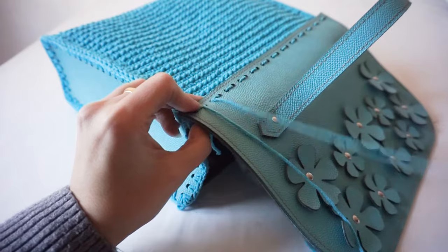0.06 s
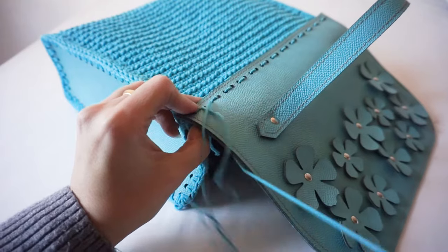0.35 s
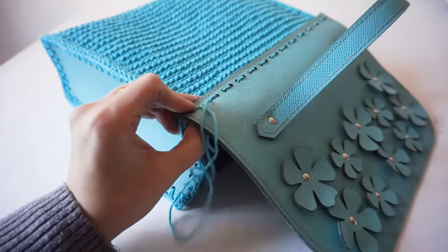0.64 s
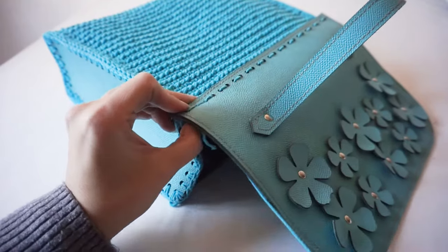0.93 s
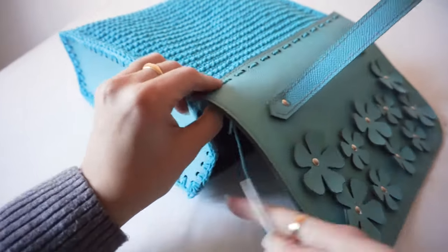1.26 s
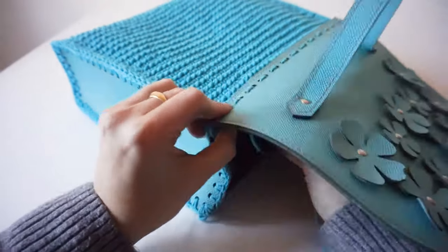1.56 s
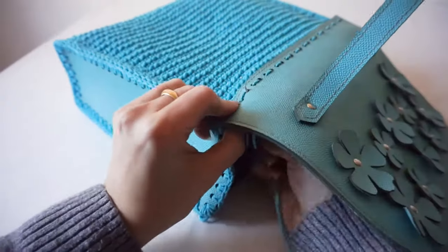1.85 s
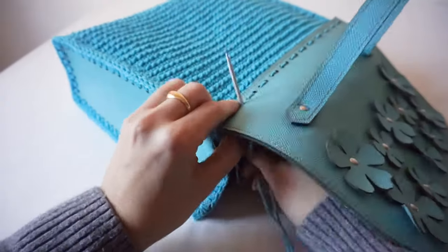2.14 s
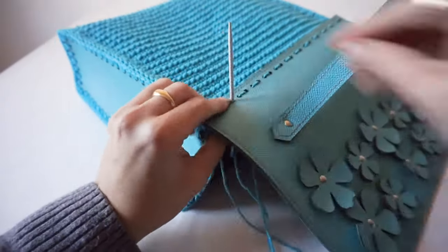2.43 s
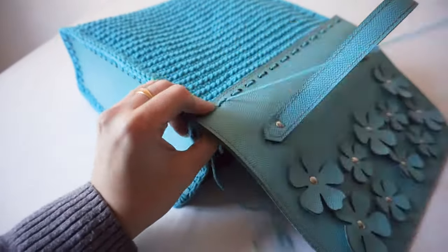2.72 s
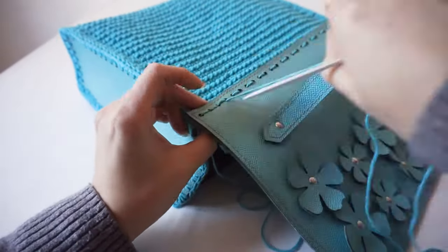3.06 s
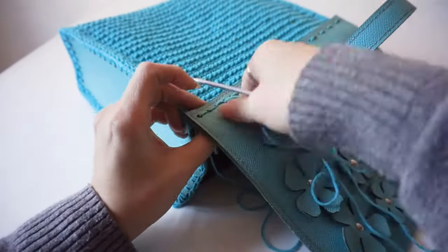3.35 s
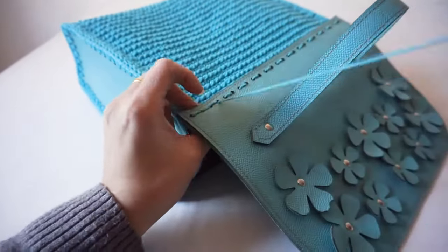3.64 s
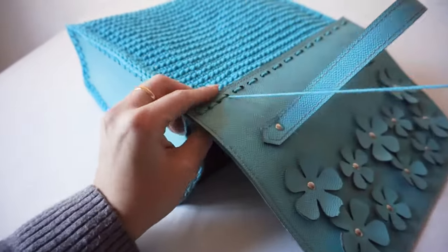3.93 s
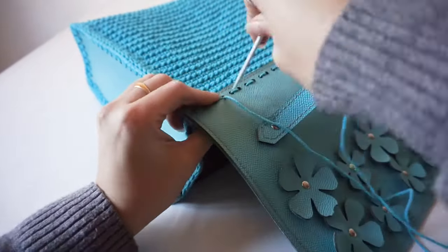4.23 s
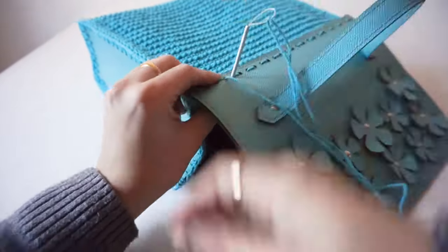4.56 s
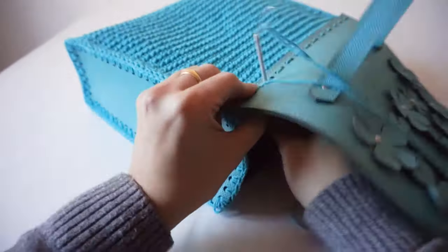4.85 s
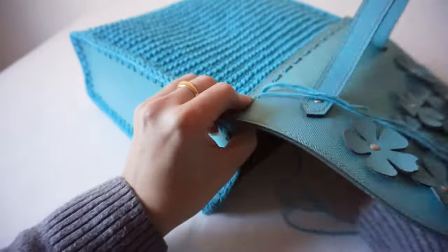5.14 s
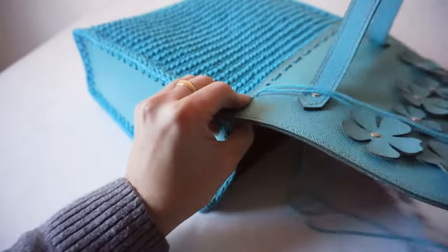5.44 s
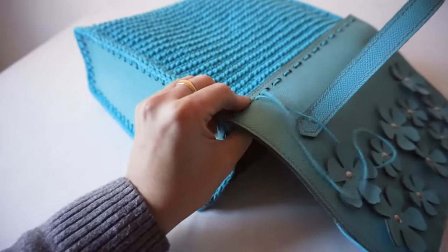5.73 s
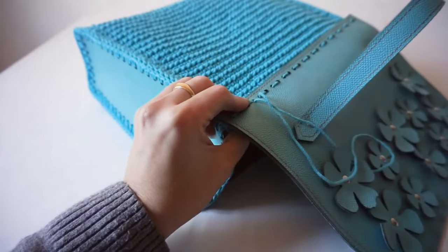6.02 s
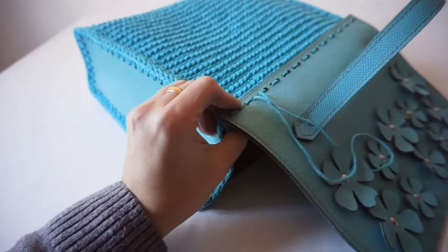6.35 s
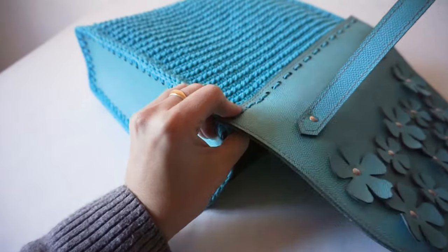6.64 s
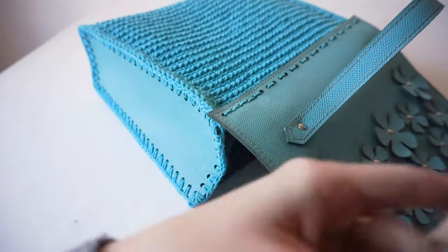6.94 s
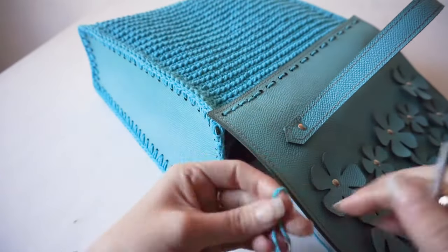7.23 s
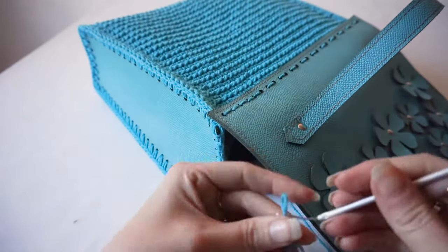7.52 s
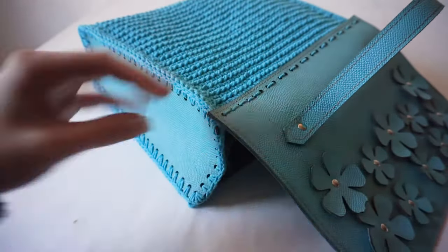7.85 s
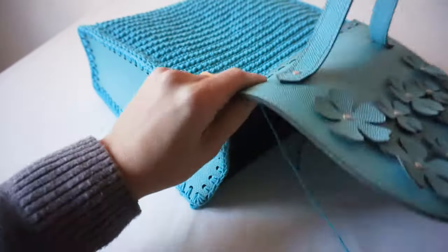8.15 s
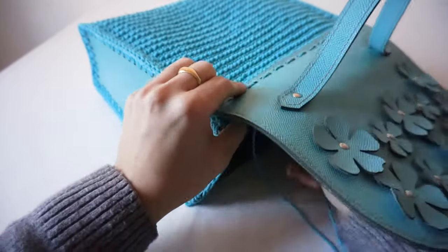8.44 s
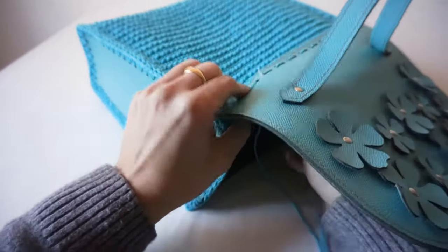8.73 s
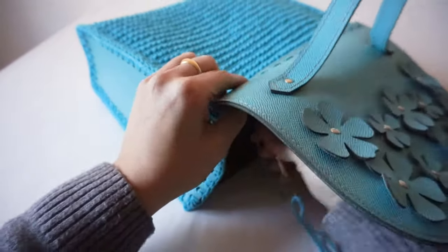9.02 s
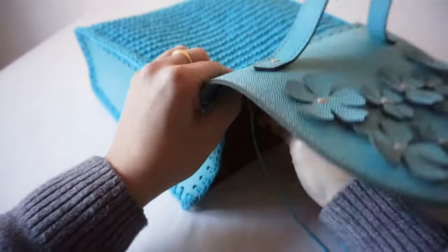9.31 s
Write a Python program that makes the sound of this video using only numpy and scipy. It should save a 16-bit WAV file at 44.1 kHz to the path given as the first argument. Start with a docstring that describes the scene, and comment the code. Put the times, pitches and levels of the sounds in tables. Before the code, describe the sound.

Hands stitch a leather flap to a crocheted bag on a table, heard close up in a small quiet room. The bag rustles and drags softly throughout, with dull bumps on the tabletop. Early on, a steel needle clinks in a quick, bright cluster. Then cord hisses through the holes in repeated short pulls, mixed with dry snaps, fingers rasping on leather and brief creaks as the needle jerks free. After a quieter spell, light bumps and ticks return.

```python
"""At a table in a small quiet room, hands stitch a leather flap to a crocheted bag, heard close up.
The bag drags and rustles, palms press on it, cord hisses through the holes and fingers rub the hide.
Leather and cord snap over edges, and bumps set the table ringing and the hollow bag humming.
The steel needle clinks, creaks as it jerks free of the hide and squeaks as the cord slips off it."""
import sys
import numpy as np
from scipy import signal
from scipy.fft import rfft, irfft
from scipy.io import wavfile
from scipy.ndimage import uniform_filter1d

SR = 44100
rng = np.random.default_rng(int(sys.argv[2]) if len(sys.argv) > 2 else 0)


def int16_out(signal):
    """Quantize to a 16-bit WAV file."""
    q = np.round(np.clip(np.atleast_2d(signal).T, -1, 1) * 32767)
    wavfile.write(sys.argv[1], SR, q.astype(np.int16))


N = 418068
EVENT_SAMPLES = SR // 2  # room for one blow or stroke
AGE = np.arange(EVENT_SAMPLES) / SR  # seconds since it began
ROOM_T60_S = 0.26  # a t60 is the time a sound takes to fall by 60 dB

# hands and bag bumping the table: t/s, level/dB, hardness/dB, weight/dB, hum f/Hz, hum against bump/dB
BUMPS = [(0.6011, -25.5, 11, -25, 358, -9.5), (0.62, -32, 5, -1, 393, -8.5),
         (0.707, -42.5, 11, -5, 366, -21), (1.2992, -28.5, 4.5, -19, 270, -14),
         (1.332, -31.5, 11, -13, 404, -29), (1.393, -33.5, 0, 4, 384, -9),
         (1.857, -39.5, 5, -11, 358, -5.5), (1.895, -37.5, 5.5, -7, 357, -7.5),
         (2.0783, -33, 1.5, -18, 386, -9), (2.338, -41, -1, -9, 394, -9), (2.356, -37, -1, -4, 394, -9),
         (2.411, -35, -2.5, -10, 286, -13), (2.419, -32, 9, -18, 388, -5), (2.433, -46, 15, -24, 380, -9),
         (2.564, -42.5, 0, -8, 400, -7.5), (2.638, -37.5, -1.5, -2, 402, -10),
         (2.724, -39, -2, -15, 411, -8), (2.995, -41.5, 4.5, -13, 348, -1.5),
         (3.251, -37, 5, -13, 517, -13.5), (3.399, -39.5, 5.5, -9, 452, -23),
         (4.656, -31.5, 1.5, -28, 354, -4.5), (4.67, -37.5, 1, -1, 358, -3),
         (4.816, -41.5, -1, -18, 361.4, -1), (4.835, -42, -2.5, -12, 386, -14),
         (4.9038, -44.5, 4, -7, 351, -4), (5.0226, -40.5, 0.5, -11, 295, -23),
         (5.0616, -22, -1, -13, 352, -8.5), (5.135, -41.5, 10, 7, 355, -6), (5.491, -44, -3.5, -6, 348, -7),
         (5.5785, -28.5, 8.5, -11.5, 358, -10), (6.273, -44.5, -1, 5.5, 349, -3),
         (6.317, -45, -4.5, -17, 333, -2), (6.334, -42, -6, 1, 367, -6.5), (6.778, -57, -3, -3, 362, -5),
         (8.338, -37.5, -4, -4.5, 412, -7.5), (8.478, -50, -4, -2, 361, -4.5),
         (8.528, -49.5, -10, -16, 327, 2.5), (8.551, -43.5, 4, 2.5, 298, -3),
         (8.571, -42.5, 7, 2.5, 352, -5), (8.781, -43.5, -7.5, -12, 252, -13),
         (9.347, -51, 0, -7, 346, -13)]
# strokes over the leather: start/s, end/s, level/dB, treble/dB
RUBS = [(0.387, 0.45, -57.5, -8), (0.689, 0.728, -59, -11), (2.096, 2.203, -62, 5), (2.278, 2.316, -50, 6),
        (2.754, 2.828, -49, -1), (3.56, 3.833, -67, 6), (4.739, 4.759, -43, 1), (4.764, 4.804, -43.5, -6),
        (4.815, 4.868, -53, -2), (5.237, 5.38, -60, 1), (5.631, 5.828, -49.5, 1.5), (6.438, 6.58, -50, 0.5),
        (8.514, 8.62, -61.5, 7), (8.782, 8.856, -55.5, -12)]
# the notes (modes) at which the table top rings: f/Hz, level/dB, t60/s
TABLE_MODES = [(90.3, -5.5, 0.26), (162, -16, 0.23), (200.2, -5.5, 0.23), (326.5, 0.5, 0.049),
               (505, -1.5, 0.036), (597, -11.5, 0.33), (689, -14.5, 0.25), (824, -8.5, 0.063),
               (887, -14.5, 0.21), (976, -10, 0.1), (1053, -12.5, 0.12), (1112, -11, 0.13),
               (1290, -6.5, 0.044), (1735, -29, 0.14), (2170, -11.5, 0.11)]
# stereo width, left and right agree only in the bass: f/Hz, side against middle/dB
STEREO_WIDTH = [(30, -24), (90, -21.5), (300, -16), (700, -6), (1400, -2), (2800, -0.5), (6000, -0.5),
                (11000, 0.5)]


def undb(db):
    """Turn decibels into a factor to multiply by."""
    return 10 ** (np.asarray(db) / 20)


def unit(x):
    """Scale a signal to an average (rms) level of 1."""
    return x / np.sqrt(np.mean(x ** 2))


def colour(x, points, size=4096):
    """Make some pitches louder and others softer, along a curve of (f/Hz, level/dB) points."""
    hz, db = np.transpose(points)
    grid_hz = np.maximum(np.fft.rfftfreq(size, 1 / SR), 1)
    gains = undb(np.interp(np.log(grid_hz), np.log(hz), db))
    # fold the cepstrum so that the filter never sounds ahead of its input
    cepstrum = irfft(np.log(gains))
    cepstrum[1:size // 2] *= 2
    cepstrum[size // 2 + 1:] = 0
    response = irfft(np.exp(rfft(cepstrum)))
    return signal.fftconvolve(np.atleast_2d(x), response[None], axes=1)[:, :x.shape[-1]]


def spread(pair):
    """Two unrelated signals become left and right, wider towards the treble."""
    side = colour(pair[1], STEREO_WIDTH)[0]
    return np.array([pair[0] + side, pair[0] - side])


def fade(t60):
    """Die away smoothly, 60 dB down after t60 seconds."""
    return np.exp(-np.log(1000) * AGE / t60)


def scatter(t60, side_db=0):
    """Dying noise with energy 1: a click when short, a cloud of echoes when long."""
    pair = rng.standard_normal((2, EVENT_SAMPLES)) * undb([[0], [side_db]])
    cloud = spread(pair) * fade(t60)
    return cloud / np.sqrt(np.sum(cloud ** 2) / 2)


def ring(modes, vary_db):
    """An object's dying notes, with energy 1; a random striking spot varies their levels."""
    tone = sum(undb(db + vary_db * rng.standard_normal()) * np.sin(2 * np.pi * hz * AGE) * fade(t60)
               for hz, db, t60 in modes)
    return tone / np.sqrt(np.sum(tone ** 2))


def excite(force, tone):
    """Every little push in the force starts the tone anew."""
    return signal.fftconvolve(force, tone[None], axes=1)[:, :force.shape[1]]


def wander(size, per_s):
    """Glide to a new random value per_s times a second."""
    hold = int(SR / per_s)
    steps = np.repeat(rng.standard_normal(size // hold + 1), hold)
    return uniform_filter1d(steps, hold)[:size]


def slips(size, per_s, size_db, grip_db, smear_db, grain_s=0.0029, smear_s=0.018):
    """Stick and slip: tiny uneven bursts, in flurries as the grip changes, smeared by nearby surfaces."""
    sizes = undb(size_db * np.minimum(rng.exponential(size=size), 5))
    slipping = rng.random(size) < per_s / SR
    grip = undb(grip_db * wander(size, per_s=55))
    energy = slipping * (sizes * grip) ** 2
    decays = np.exp(-1 / (SR * np.array([grain_s, smear_s])))
    grain, smear = (signal.lfilter([1 - decay], [1, -decay], energy) for decay in decays)
    loudness = np.sqrt(grain + undb(smear_db) ** 2 * smear + 1e-12)
    return loudness * spread(rng.standard_normal((2, size)))


def add_blow(out, t, blow, db, window=90):
    """Place a blow at t seconds; its loudest stretch of window samples gets the level db."""
    loudest = np.sqrt(uniform_filter1d(np.mean(blow ** 2, axis=0), window).max())
    first = max(int(t * SR), 0)
    out[:, first:first + EVENT_SAMPLES] += (blow * undb(db) / loudest)[:, :N - first]


def add_stroke(out, start, end, sound, db, swell_db, rise_s, fall_s):
    """Place one hand movement: it gathers speed, swells to its middle and dies away after the end."""
    elapsed, length = AGE - rise_s / 2, end - start
    progress = np.clip(elapsed / length, 0, 1)
    swell = undb(swell_db * (np.sin(np.pi * progress) - 2 / np.pi))
    rise = np.minimum(AGE / rise_s, 1)
    fall = np.exp(-np.maximum(elapsed - length, 0) / fall_s)
    stroke = unit(sound) * swell * rise * fall * undb(db)
    first = max(int((start - rise_s / 2) * SR), 0)
    out[:, first:first + EVENT_SAMPLES] += stroke[:, :N - first]


def room_air(level_db=-65.5):
    """The steady hush of the room and the hiss of the microphone."""
    # tone of the hush: f/Hz, level/dB
    air_colour = [(25, -27), (90, -7), (140, -6), (360, -14), (650, -8), (1300, -32), (2000, -14),
                  (3500, -16.5), (6000, -16), (10000, -19), (16000, -17.5)]
    noise = spread(rng.standard_normal((2, N)))
    return undb(level_db) * unit(colour(noise, air_colour))


def leaning(ease_s=0.069):
    """Rises towards 1 while a stroke over the leather leans on the bag, and is 0 otherwise."""
    t = np.arange(N) / SR
    pressed = np.any([(t > start) & (t < end) for start, end, *_ in RUBS], axis=0)
    return uniform_filter1d(pressed.astype(float), int(ease_s * SR))


def settling(against_bump_db=-20, decay_s=0.033):
    """A gain that jumps with every bump and dies away as the stitches come to rest."""
    jolts = np.zeros(N)
    for t, db, *_ in BUMPS:
        jolts[int(t * SR)] += undb(db + against_bump_db)
    return signal.lfilter([1], [1, -np.exp(-1 / (decay_s * SR))], jolts)


def bag_sliding(drag_db=-5, lean_db=5):
    """Worked by the hands, the bag shudders on the table, which rings along, and its wool crackles."""
    # how hard the hands work, swelling with each stitch: t/s, level/dB
    effort = [(0.0, -60), (0.34, -65.5), (0.61, -57.5), (1.11, -64.5), (1.4, -56.5), (1.87, -62),
              (2.21, -53), (4.43, -66), (4.86, -53.5), (5.36, -58.5), (5.68, -58.5), (5.86, -64),
              (6.31, -69), (6.42, -58.5), (6.97, -65), (7.76, -65.5), (9.0, -57.5), (9.48, -60.5)]
    # notes of the air in the resting bag: f/Hz, level/dB, t60/s
    bag_modes = [(358, 6.5, 0.21), (386, 5.5, 0.24)]
    # tone of the bag dragging: f/Hz, level/dB
    drag_colour = [(30, -35), (60, -16.5), (88, 0), (125, -14.5), (240, -4), (350, -12), (400, 2.5),
                   (480, -5.5), (800, -16), (1100, -19.5), (2400, -30.5)]
    # tone of the wool rustling: f/Hz, level/dB
    rustle_colour = [(300, 5.5), (700, 12), (1400, 8), (2000, 4.5), (3200, 4.5), (5000, 1.5), (8000, 1),
                     (15000, -0.5)]
    effort_db = np.interp(np.arange(N) / SR, *np.transpose(effort))
    shudder = slips(N, per_s=180, size_db=1.0, grip_db=0.5, smear_db=-0.5)
    ringing = excite(shudder, ring(TABLE_MODES + bag_modes, vary_db=4.5))
    drag = unit(colour(shudder, drag_colour)) + unit(ringing)
    drag_gain = undb(effort_db + drag_db + lean_db * leaning())
    crackle = slips(N, per_s=900, size_db=3.8, grip_db=1.8, smear_db=2)
    rustle = colour(crackle, rustle_colour)
    rustle_gain = np.hypot(undb(effort_db), settling())
    return unit(drag) * drag_gain + unit(rustle) * rustle_gain


def palm_presses(hollow_db=11, width_ratio=1.235):
    """A soft hand spreads over the stitches, which slip one by one and murmur in the hollow bag."""
    # palm and sleeve pressing on the crochet: start/s, end/s, level/dB, hollow f/Hz
    presses = [(0.008, 0.05, -57, 373), (0.38, 0.525, -62.5, 365), (1.01, 1.041, -55, 360),
               (1.113, 1.195, -60.5, 345), (2.19, 2.27, -51, 350), (3.055, 3.123, -54, 355),
               (3.486, 3.613, -59, 344), (3.733, 3.78, -54, 358), (4.701, 4.748, -49.5, 370),
               (5.691, 5.84, -57, 320), (6.421, 6.585, -54, 322), (7.436, 7.5, -58.5, 405),
               (8.005, 8.097, -58, 300), (9.119, 9.156, -54.5, 358)]
    # dull tone of pressed stitches: f/Hz, level/dB
    press_colour = [(50, -15), (220, -1), (500, 0), (1100, -9.5), (8000, -44)]
    out = np.zeros((2, N))
    for start, end, db, hz in presses:
        grain = slips(EVENT_SAMPLES, per_s=420, size_db=1.5, grip_db=1.0, smear_db=-2.5)
        stitches = colour(grain, press_colour)
        murmur = colour(stitches, [(hz / width_ratio, 0), (hz, hollow_db), (hz * width_ratio, 0)])
        add_stroke(out, start, end, murmur, db, swell_db=2, rise_s=0.016, fall_s=0.021)
    return out


def cord_pulls(width_ratio=1.27, octave_db=3):
    """Fibres hiss as they slide; their even twist adds a narrow zip and a faint octave above it."""
    # cord and wool sliding: start/s, end/s, level/dB, zip f/Hz, zip boost/dB
    pulls = [(0.318, 0.475, -58, 5900, -2), (0.506, 0.733, -53.5, 6750, 8.5), (0.78, 0.875, -55, 7260, 6),
             (1.46, 1.608, -56.5, 7320, 6), (2.058, 2.184, -49.5, 6900, 11), (2.257, 2.403, -50, 6700, 8),
             (2.423, 2.566, -59.5, 7000, 30), (2.614, 2.76, -52, 5900, 8), (2.76, 2.816, -44.5, 5870, 17.5),
             (2.846, 3.1, -59.5, 6850, 9), (3.49, 3.58, -59, 6470, 3), (3.581, 3.76, -51, 5950, 10),
             (3.628, 3.762, -56, 11700, 9), (4.483, 4.494, -47, 5900, -3), (4.736, 4.81, -46, 7300, 3.5),
             (4.96, 4.996, -49, 7300, 12), (5.248, 5.428, -55.5, 6700, 3.5), (5.48, 5.801, -51, 6050, 6),
             (6.351, 6.43, -57, 6860, 9), (6.439, 6.555, -50, 6200, 7), (6.847, 6.97, -63.5, 6900, 10),
             (7.203, 7.39, -65, 6600, 12), (8.123, 8.27, -62.5, 6660, 8), (8.353, 8.634, -58, 7200, 0),
             (8.923, 9.115, -59.5, 6670, 15)]
    # tone of the hissing cord: f/Hz, level/dB
    cord_colour = [(1000, 4.6), (3000, 5.6), (5000, 4.1), (7000, 3.5), (9000, 2.7), (11500, 4.6),
                   (13500, 2.8), (16000, 1)]
    out = np.zeros((2, N))
    for start, end, db, zip_hz, zip_db in pulls:
        grain = slips(EVENT_SAMPLES, per_s=1800, size_db=3.5, grip_db=2.5, smear_db=2)
        hiss = colour(grain, cord_colour)
        for hz, boost_db in ((zip_hz, zip_db), (2 * zip_hz, octave_db)):
            hiss = colour(hiss, [(hz / width_ratio, 0), (hz, boost_db), (hz * width_ratio, 0)])
        add_stroke(out, start, end, hiss, db, swell_db=1, rise_s=0.031, fall_s=0.022)
    return out


def leather_rubs():
    """Fingers and cord rasp over the hide in quick little slips; a soft fingertip gives less treble."""
    # tone of rubbed leather: f/Hz, level/dB
    leather_colour = [(200, -1), (400, 6), (800, -12.5), (1270, 6), (1600, -2), (2250, 4), (2900, 0.5),
                      (3450, 3), (4300, -2), (5100, -11), (5900, -24), (7500, -16), (14000, -32)]
    out = np.zeros((2, N))
    for start, end, db, treble_db in RUBS:
        grain = slips(EVENT_SAMPLES, per_s=750, size_db=2.3, grip_db=1.7, smear_db=-6, grain_s=0.0016)
        rasp = colour(grain, leather_colour)
        rasp = colour(rasp, [(2300, 0), (4000, treble_db)])
        add_stroke(out, start, end, rasp, db, swell_db=3, rise_s=0.025, fall_s=0.017)
    return out


def edge_snaps(near_db=-5, room_db=-9, extra_treble_db=1):
    """A fold or a strand lets go within a few milliseconds: a dry, grainy tick with no pitch."""
    # leather and cord snapping over an edge: t/s, level/dB, treble/dB
    snaps = [(0.445, -40.5, 16), (0.6, -37, -34), (1.895, -27.5, 10.5), (2.4182, -32, 9), (2.629, -32, -2),
             (2.717, -37.5, 0), (2.9068, -40, 17), (2.971, -43.5, -11), (2.9854, -35, 2), (3.2508, -37, 4),
             (3.399, -37, 0), (3.585, -39, 12), (3.764, -36.5, 9), (3.91, -40, -3), (4.1808, -43, 18),
             (4.624, -40.5, 3), (4.6554, -35.5, 7), (4.8347, -37.5, -11), (4.862, -36.5, -8),
             (4.9013, -39, -4), (5.359, -33.5, 11), (5.375, -37.5, -3), (5.5785, -30.5, -1),
             (5.876, -49.5, -5), (6.432, -39, 4), (8.549, -41, 10), (8.7157, -44, 29), (8.7808, -42.5, 6),
             (8.819, -42, 10), (8.863, -38.5, -3), (9.1974, -53, -21), (9.3505, -41.5, 7), (9.398, -41, 0)]
    # tone of a snap: f/Hz, level/dB
    snap_colour = [(300, -12), (1200, -3), (2600, 3), (4500, 0), (5700, 0), (7000, -3.5), (10000, -7.5),
                   (16000, -10.5)]
    out = np.zeros((2, N))
    for t, db, treble_db in snaps:
        release = scatter(0.009)
        echoes = undb(near_db) * scatter(0.23) + undb(room_db) * scatter(ROOM_T60_S)
        tick = colour(release + echoes, snap_colour)
        tick = colour(tick, [(3500, 0), (10000, treble_db + extra_treble_db)])
        add_blow(out, t, tick, db)
    return out


def table_bumps(modes_db=-3, near_db=-2, room_db=-6, extra_bass_db=2):
    """Each push rings the table top and sets the hollow bag humming; the soft bag bounces once."""
    # tone of a knock on the table: f/Hz, level/dB
    bump_colour = [(30, -18), (60, -15), (88, 0), (125, -3), (340, 3), (520, -4), (1100, -7), (2200, -10),
                   (3400, -16), (12000, -33)]
    touch_rise_s, touch_db = 0.0036, -55.5  # a touch this light builds up this slowly, louder ones faster
    bounce_s, bounce_db, bounce_spread = 0.0105, -7.5, 0.2024
    hum_rise_s, hum_t60_s = 0.0022, 0.18
    hum_shape = (1 - np.exp(-AGE / hum_rise_s)) * fade(hum_t60_s)
    out = np.zeros((2, N))
    for t, db, hardness_db, weight_db, hum_hz, hum_db in BUMPS:
        contact = 0.45 * (AGE == 0) + 0.55 * scatter(0.025, side_db=-10)
        echoes = undb(near_db) * scatter(0.24, side_db=-35) + undb(room_db) * scatter(ROOM_T60_S)
        knock = colour(contact + echoes, bump_colour)
        knock /= np.sqrt(np.sum(knock ** 2) / 2)
        blow = knock + undb(modes_db) * ring(TABLE_MODES, vary_db=1.5)
        blow = colour(blow, [(90, weight_db + extra_bass_db), (300, 0), (450, 0), (1000, hardness_db / 2)])
        # a softer contact lasts longer, so it loses more treble
        cutoff_hz = np.clip(1150 * undb(hardness_db), 300, 2600)
        blow = signal.sosfilt(signal.butter(4, cutoff_hz, fs=SR, output="sos"), blow)
        rise_s = touch_rise_s * undb(touch_db - db) ** 2
        blow *= 1 - np.exp(-AGE / rise_s)
        add_blow(out, t, blow, db, window=180)
        delay_s = bounce_s * np.exp(bounce_spread * rng.standard_normal())
        add_blow(out, t + delay_s, blow, db + bounce_db, window=180)
        hum = np.sin(2 * np.pi * hum_hz * AGE) * hum_shape
        add_blow(out, t, hum[None], db + hum_db, window=180)
    return out


def needle_clinks(tip_db=-3, modes_db=-2, near_db=-4, room_db=-9, extra_treble_db=3):
    """The steel needle strikes and rings; the fingers quiet it within a few hundredths of a second."""
    # the needle's strikes: t/s, level/dB, treble/dB
    clinks = [(1.298, -33, 1), (1.3077, -23, -4), (1.3088, -20, -0.5), (1.316, -23, -2), (1.331, -26, -6),
              (1.3325, -22, -7), (1.336, -39, 5), (1.351, -33, -4), (1.4274, -31.5, -1),
              (2.0454, -40, -4.5), (2.234, -33.5, 1), (2.3436, -27, 4.5)]
    # notes of the needle held in the fingers: f/Hz, level/dB, t60/s
    needle_modes = [(2760, -4, 0.035), (3330, 4, 0.013), (4000, -1, 0.017), (4100, 7.5, 0.029),
                    (4420, 7.5, 0.011), (5560, -13, 0.016), (6200, -2, 0.016), (7540, -4, 0.0066)]
    # tone of the strike: f/Hz, level/dB
    clink_colour = [(300, 3.5), (1400, -5), (3000, 2), (4200, 5.5), (6200, 5), (8000, 4), (11000, 1.5),
                    (16000, -2)]
    out = np.zeros((2, N))
    for t, db, treble_db in clinks:
        crack = undb(tip_db) * scatter(0.0019) + scatter(0.088)
        echoes = undb(near_db) * scatter(0.36) + undb(room_db) * scatter(ROOM_T60_S)
        steel = excite(scatter(0.002, side_db=-3), ring(needle_modes, vary_db=2))
        clink = unit(colour(crack + echoes, clink_colour)) + undb(modes_db) * unit(steel)
        clink = colour(clink, [(4500, 0), (10000, treble_db + extra_treble_db)])
        add_blow(out, t, clink, db)
    return out


def needle_catches(modes_db=-8, near_db=-5):
    """The needle sticks in the hide and jerks free: a short creak that rings the stiff flap."""
    # the needle catching: t/s, level/dB, strongest f/Hz
    catches = [(2.639, -40, 1830), (2.652, -45, 2210), (2.987, -44.5, 1290), (3.2405, -39, 1110),
               (3.2505, -36.5, 1050), (3.262, -38.5, 1050), (3.377, -46, 1300), (3.398, -50, 1500),
               (3.405, -41.5, 1420), (5.5654, -37, 2000), (5.5785, -33, 1250), (8.55, -46, 1700),
               (8.571, -42, 1610), (8.7745, -46.5, 2020), (8.781, -35, 1770), (8.819, -40, 2400),
               (9.123, -50.5, 1600), (9.129, -46, 1600), (9.197, -49.5, 2000), (9.352, -47, 1930)]
    # notes of the leather flap: f/Hz, level/dB, t60/s
    flap_modes = [(942, 3, 0.077), (1090, 13.5, 0.021), (1330, 5.5, 0.075), (1770, 1, 0.057),
                  (2215, 0, 0.16), (2620, 6.5, 0.043), (3210, 6, 0.05)]
    out = np.zeros((2, N))
    for t, db, hz in catches:
        jerk = scatter(0.0066, side_db=-14) + undb(near_db) * scatter(0.22, side_db=-20)
        flap = unit(jerk) + undb(modes_db) * unit(ring(flap_modes, vary_db=3.5))
        peak = [(hz / 4, -20), (hz / 1.39, -9), (hz, 0), (hz * 1.34, -6), (hz * 3, -18), (16000, -28)]
        add_blow(out, t, colour(flap, peak), db)
    return out


def needle_pings(note_hz=4090, t60_s=0.045):
    """The taut cord slips off the loosely held needle, which squeaks on one thin note."""
    # the cord slipping off: t/s, level/dB
    pings = [(5.375, -47.5), (5.5, -52), (9.398, -50)]
    note = np.sin(2 * np.pi * note_hz * AGE) * fade(t60_s)
    out = np.zeros((2, N))
    for t, db in pings:
        slip = scatter(0.019, side_db=-10)
        add_blow(out, t, excite(slip, note), db)
    return out


def scene(gain_db=0.08):
    """Add up all the sounds; the work lies a little to the right, which shows most in the treble."""
    left, right = (table_bumps() + palm_presses() + needle_clinks() + needle_pings() + needle_catches()
                   + edge_snaps() + leather_rubs() + cord_pulls() + bag_sliding())
    right = colour(right, [(250, 0.51), (1500, 1.5)])[0]
    return undb(gain_db) * np.vstack([left, right]) + room_air()


def record(dry, bottom_hz=52, top_hz=15900):
    """Cut away the deepest rumble and the highest treble."""
    low_cut = signal.butter(2, bottom_hz, "high", fs=SR, output="sos")
    high_cut = signal.ellip(10, 0.2, 70, top_hz, fs=SR, output="sos")
    return signal.sosfilt(high_cut, signal.sosfilt(low_cut, dry))


dry = scene()
out = record(dry)
int16_out(out)
```